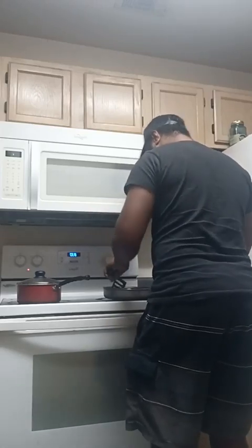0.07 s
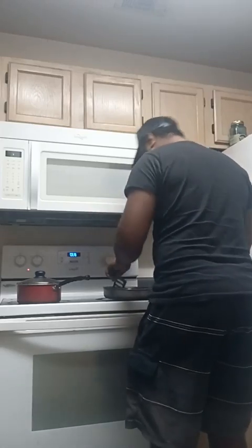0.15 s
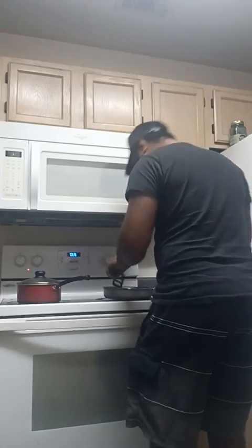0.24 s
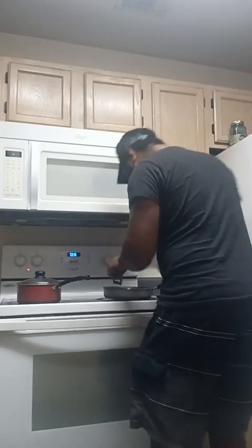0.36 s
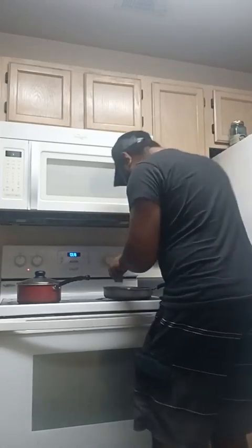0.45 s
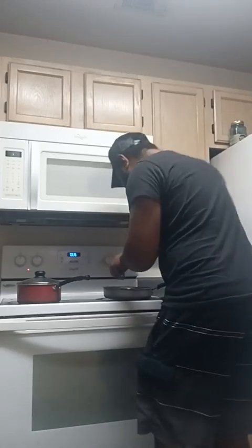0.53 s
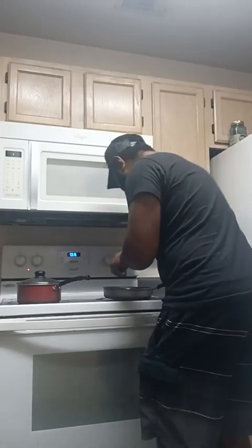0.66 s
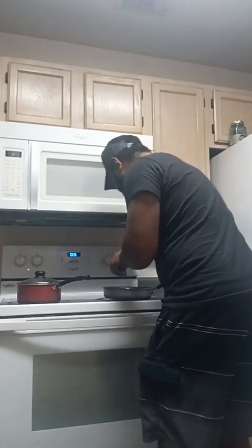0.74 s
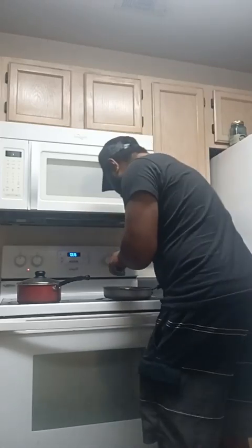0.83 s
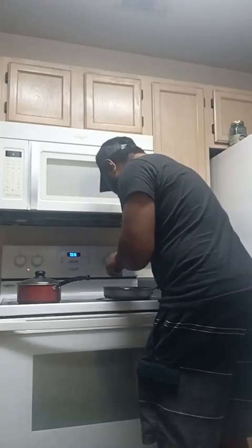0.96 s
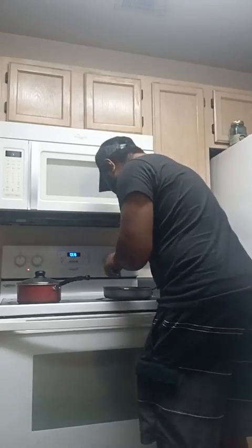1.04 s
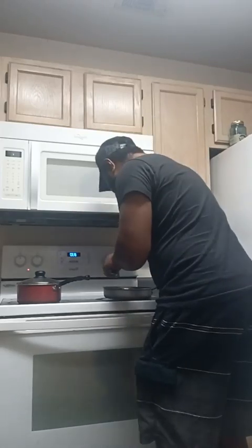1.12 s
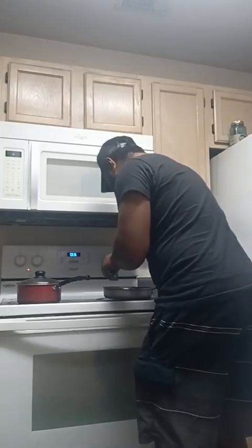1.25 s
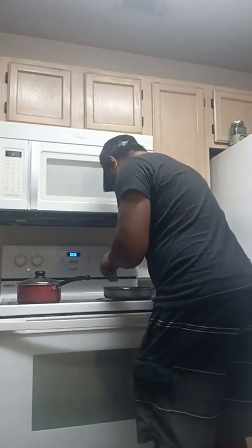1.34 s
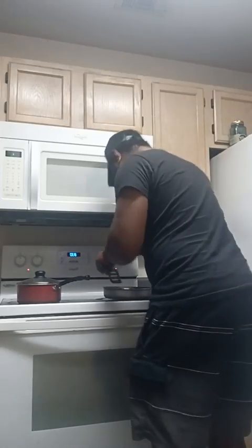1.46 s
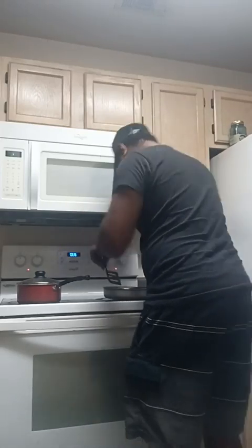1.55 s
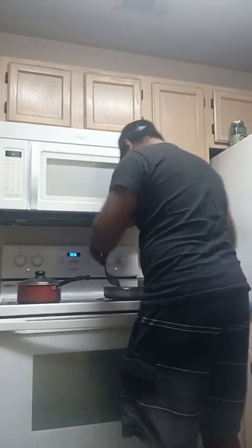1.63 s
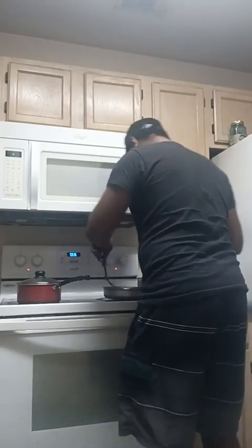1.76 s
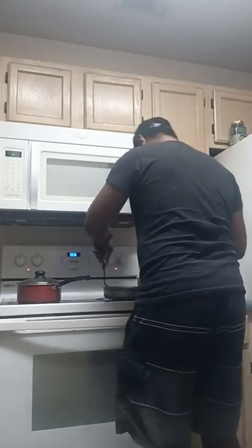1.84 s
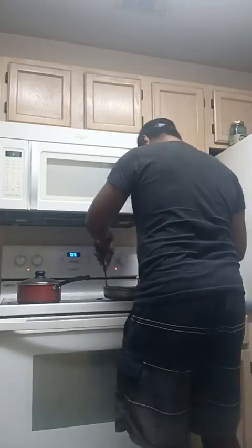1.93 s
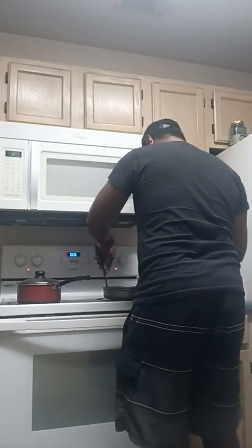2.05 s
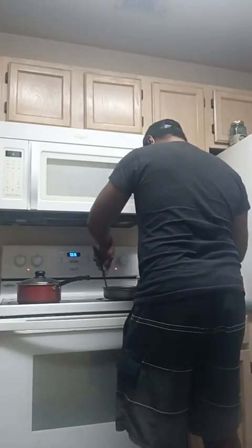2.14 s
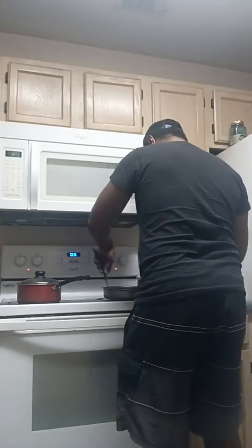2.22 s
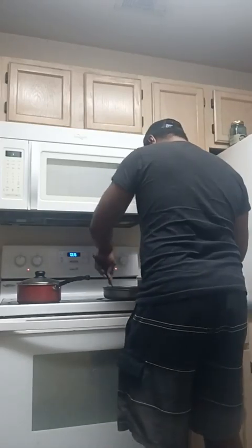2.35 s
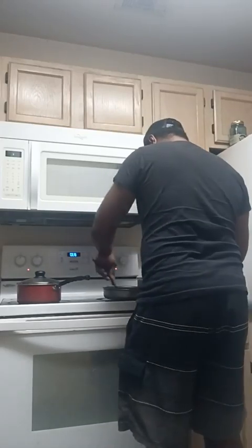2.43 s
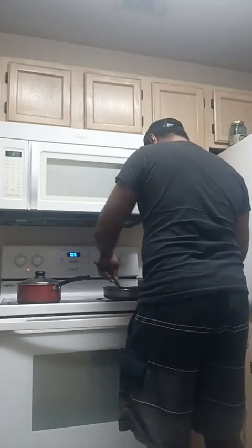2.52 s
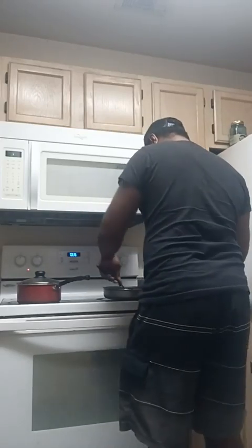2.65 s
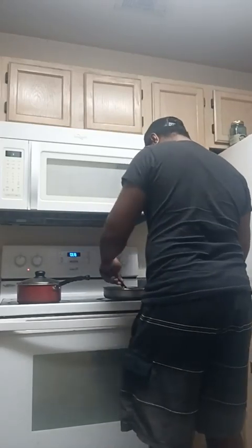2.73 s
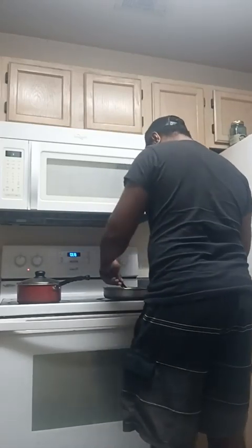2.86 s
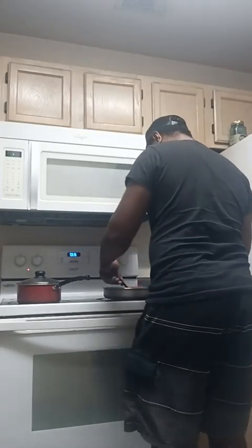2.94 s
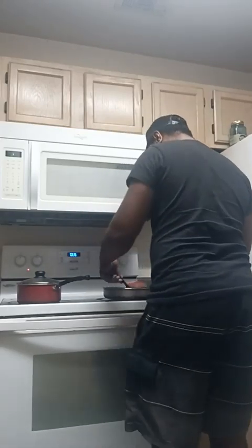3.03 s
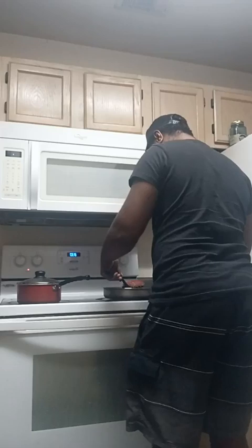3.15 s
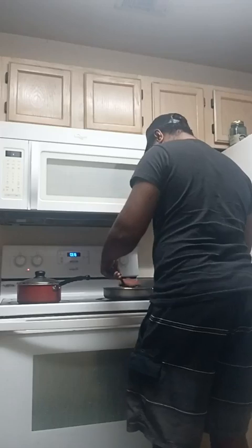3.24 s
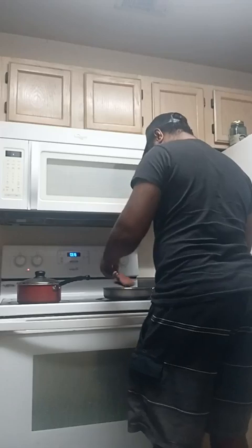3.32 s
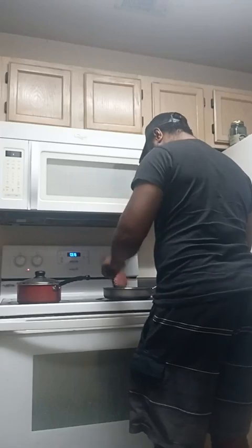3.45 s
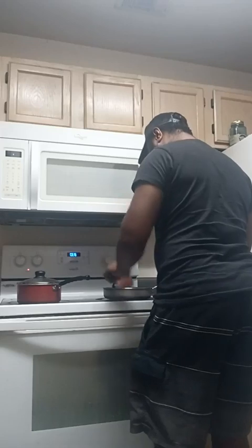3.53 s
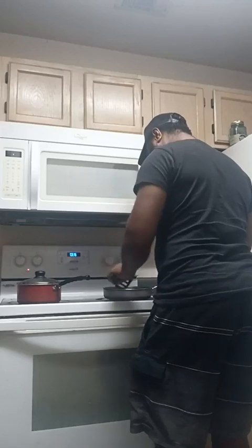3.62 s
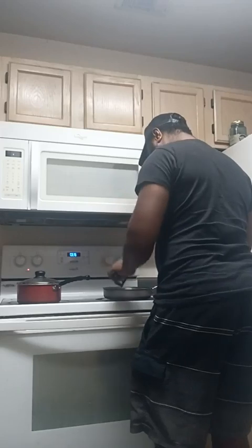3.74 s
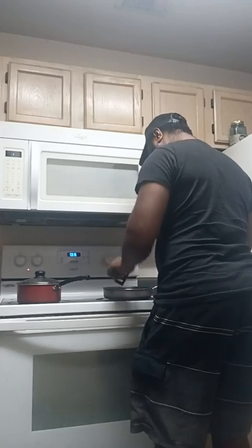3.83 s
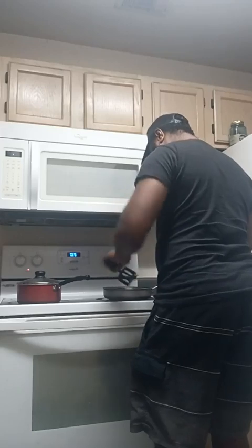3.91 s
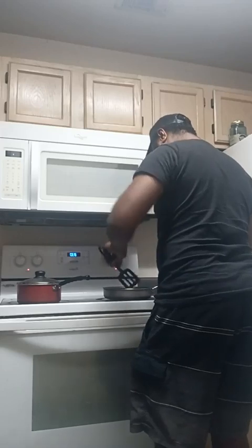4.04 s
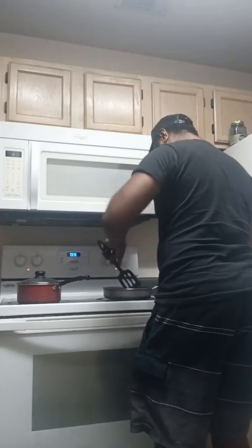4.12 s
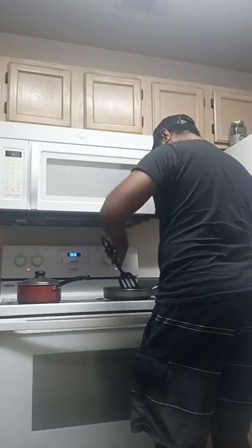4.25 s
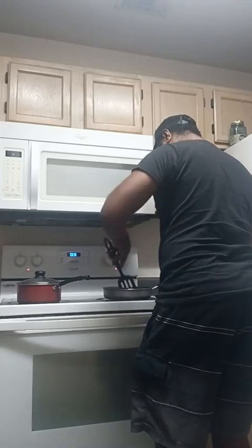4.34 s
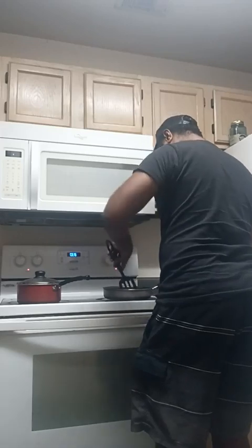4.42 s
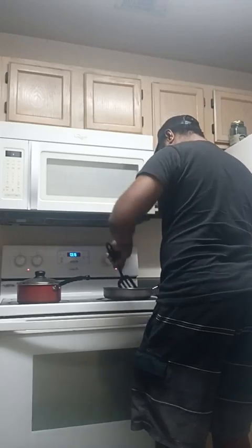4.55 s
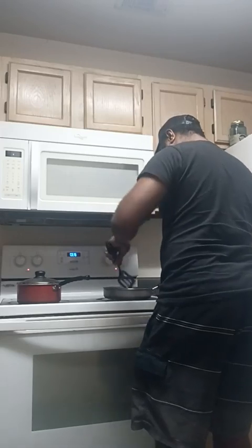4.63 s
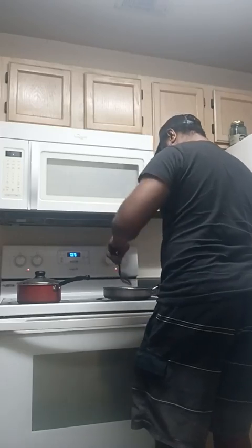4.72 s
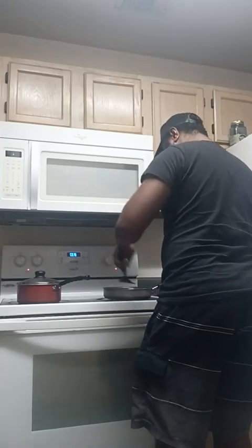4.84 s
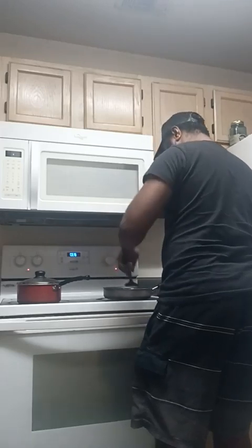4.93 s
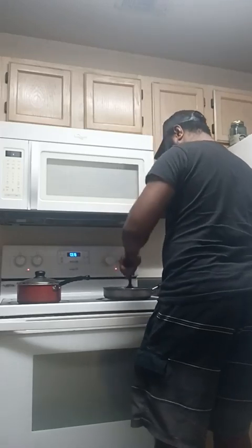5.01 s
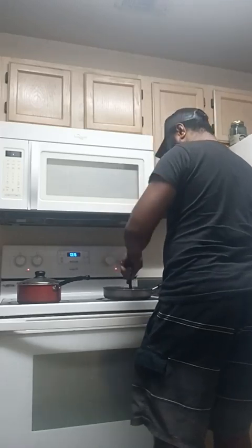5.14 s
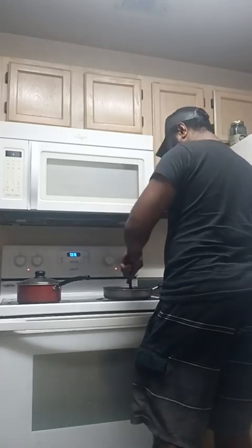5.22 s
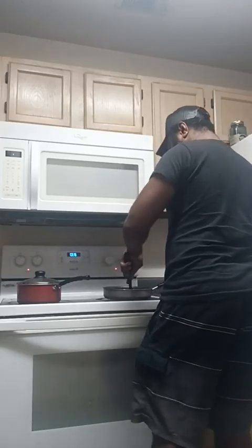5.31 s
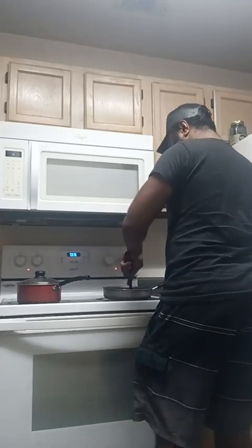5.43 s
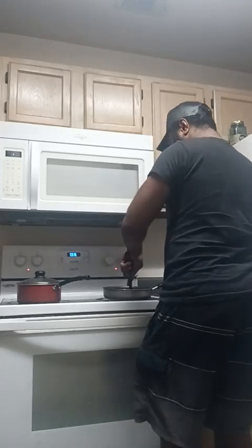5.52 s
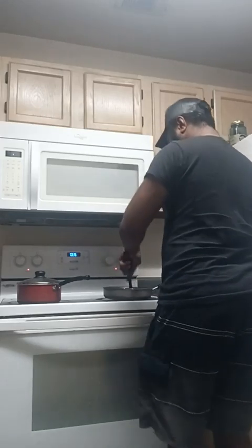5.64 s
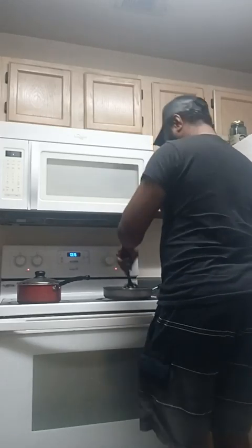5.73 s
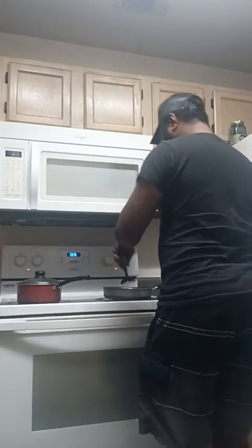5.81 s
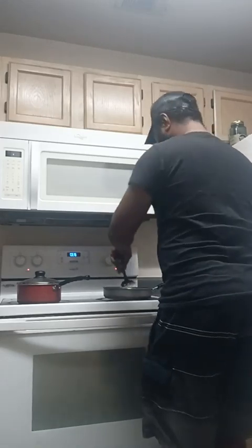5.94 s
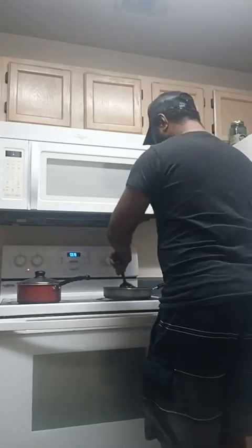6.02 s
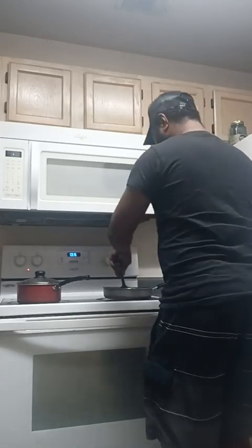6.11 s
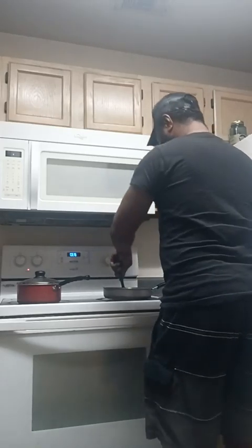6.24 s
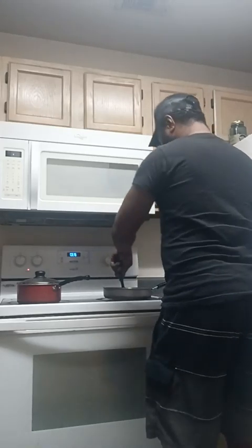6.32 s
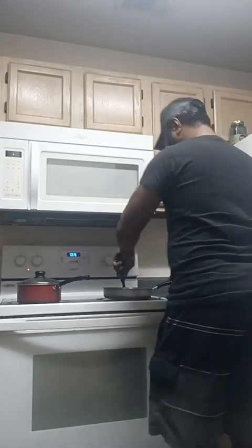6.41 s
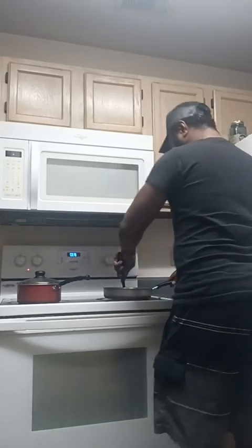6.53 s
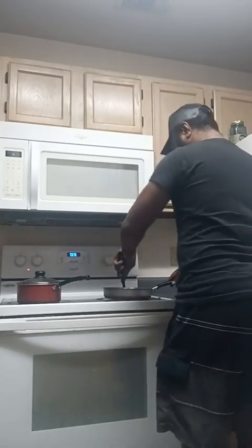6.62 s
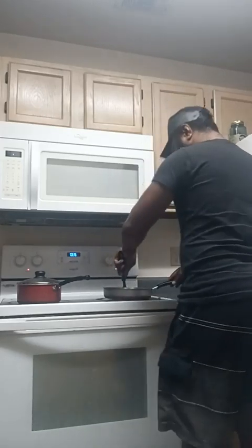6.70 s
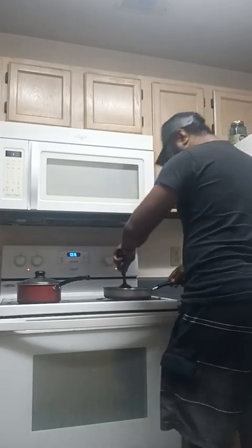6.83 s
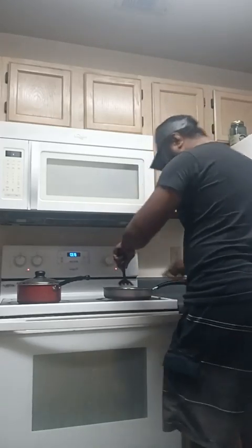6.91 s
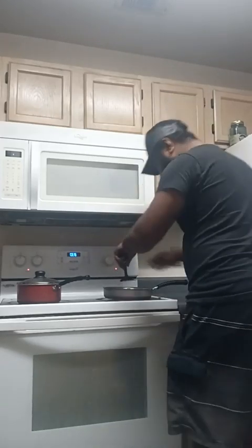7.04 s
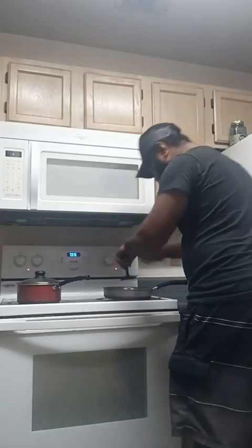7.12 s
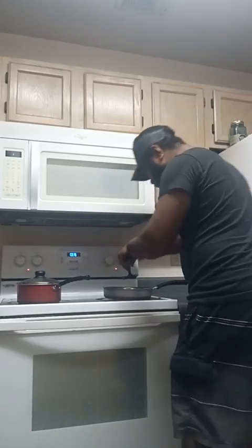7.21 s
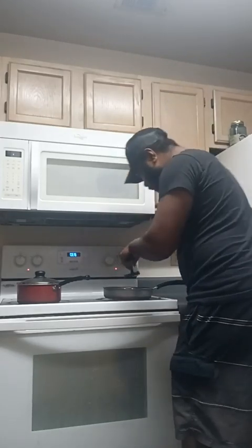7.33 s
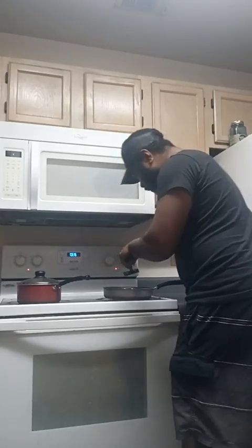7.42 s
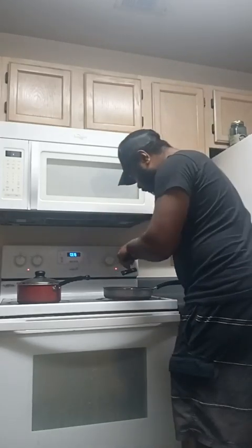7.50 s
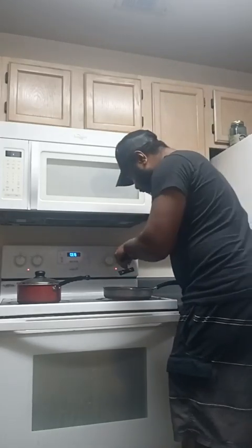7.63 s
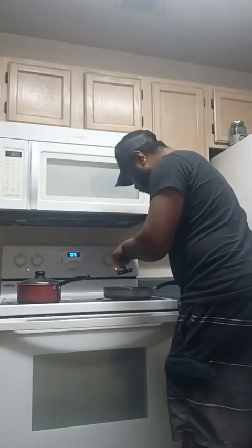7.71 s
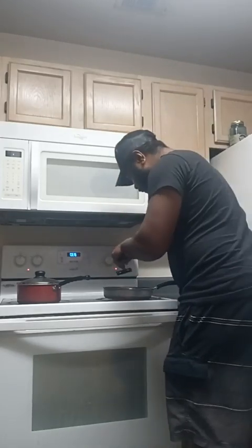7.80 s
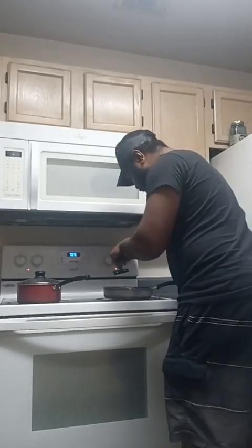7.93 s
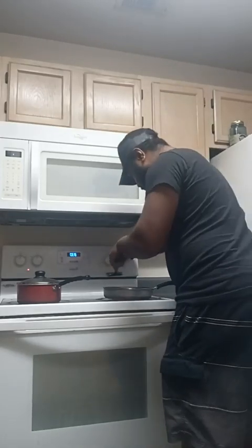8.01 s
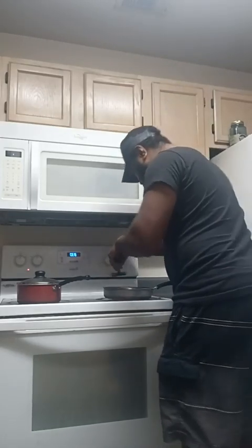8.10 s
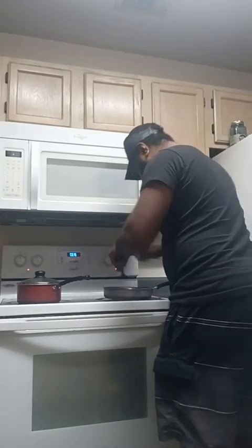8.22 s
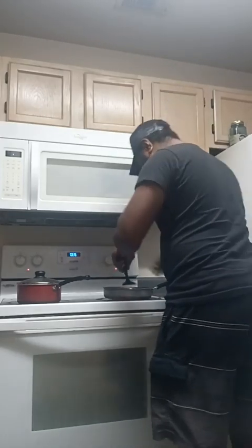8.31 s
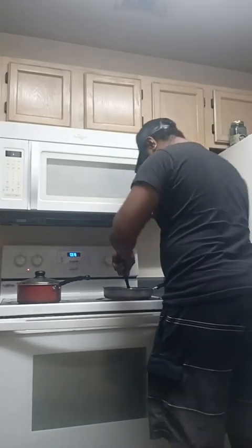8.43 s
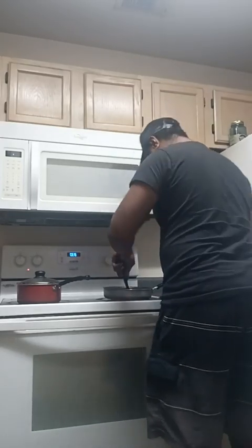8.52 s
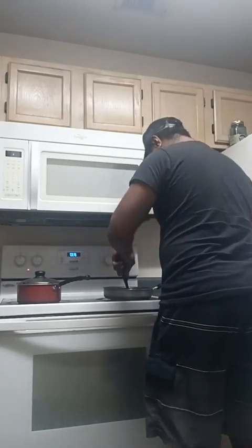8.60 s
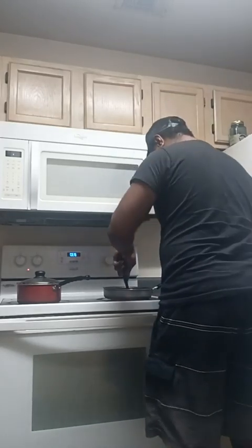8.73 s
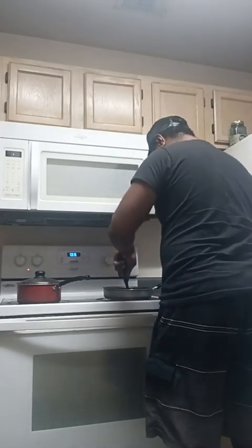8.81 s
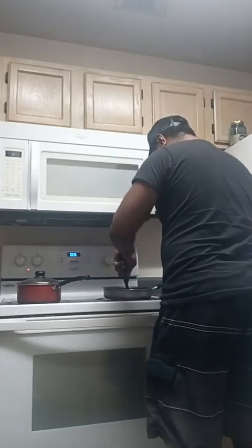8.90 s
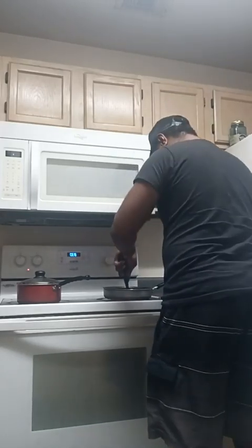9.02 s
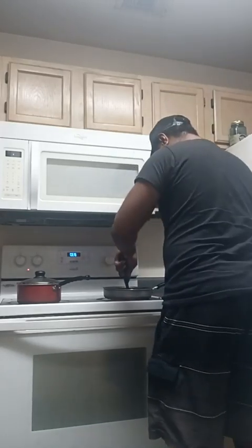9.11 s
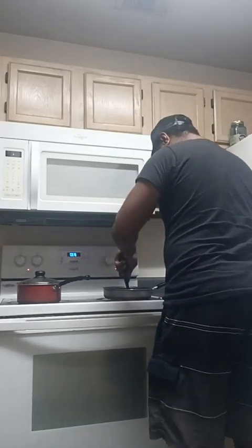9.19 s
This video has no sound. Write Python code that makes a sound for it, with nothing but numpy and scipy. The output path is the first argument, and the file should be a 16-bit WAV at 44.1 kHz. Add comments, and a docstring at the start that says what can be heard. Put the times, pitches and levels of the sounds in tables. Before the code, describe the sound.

Meat patties fry in a pan in a small, hard-surfaced kitchen, heard from a few steps away, identical in both channels. A bright, dense sizzle opens with a sharp spit, bubbling fat and fine ticking droplets, over faint low appliance hum, soft air and rumble. Around 1.7 s come two dull, faint knocks; the frying thins from about 2.5 to 3.5 s. At 3.45 s the spatula gives a tight double clack, the loudest, ringing the pan; two more clacks follow at 4.05 and 4.2 s. The sizzle flares near 4.5 s and stays lively. Lighter taps fall at 5.0 and 5.5 s, and steam spits crowd in from 5.4 to 8.2 s, strongest around 6.4 to 6.9 s. Barely audible taps pass at 7.2 s. At 8.43 s a light scrape-like tap and tiny rough squeak lead into a thin, wavering steam whistle until 9.2 s.

```python
"""A lively sizzle with sharp spits of steam, then clacks and a brief squeak, over a low appliance hum.
Meat patties fry in a pan on a kitchen stove, a few steps from the listener: random clicks, coloured by
filters, make the bubbling fat and the steam. A plastic spatula flips a patty; its blows ring the pan.
A small hard room blurs the frying, spits, clacks and squeaks. Both channels are the same."""
import sys
import numpy as np
from scipy import signal
from scipy.fft import rfft, irfft
from scipy.io import wavfile
from scipy.ndimage import uniform_filter1d

SR = 44100
rng = np.random.default_rng(int(sys.argv[2]) if len(sys.argv) > 2 else 0)


def dump_mix(stems):
    """Bounce the given channels to the path in sys.argv[1] as a 16-bit WAV at rate SR."""
    frames = np.atleast_2d(stems).T  # one column per channel
    limited = np.clip(frames, -1, 1)  # hard clip at full scale
    pcm = np.round(limited * 32767).astype(np.int16)
    wavfile.write(sys.argv[1], SR, pcm)


N = 408366   # samples, about 9.26 s

# The frying dies down while a patty is lifted, flares when it lands on its wet side, then stays lively.
# Levels before each layer's trim:
# (t/s, wet sputter level/dB, coarse sizzle level/dB, fine sizzle level/dB, finest droplets level/dB)
FRYING_LEVELS = [(0.0, -52, -44.5, -40.5, -47.5), (1.29, -56.5, -50, -43.5, -52.5),
                 (2.14, -53.5, -48.5, -42, -50.5), (2.47, -51, -49.5, -49.5, -51),
                 (3.07, -61, -53, -49.5, -56), (3.43, -58.5, -58, -45, -50.5),
                 (3.58, -57.5, -53, -41.5, -48.5), (4.02, -49, -50.5, -45.5, -50),
                 (4.26, -50, -46.5, -45, -51), (4.46, -45.5, -40, -40, -47), (4.77, -46, -46.5, -42, -52.5),
                 (5.26, -48, -44, -43.5, -50.5), (5.57, -49, -39.5, -38, -48.5),
                 (6.14, -50, -42.5, -40, -51), (6.34, -48, -36.5, -38.5, -52.5),
                 (6.96, -53.5, -42, -38.5, -53), (8.23, -52, -39.5, -41.5, -57),
                 (9.26, -50, -40, -38, -49.5)]
# Blows of spatula and patty on the pan, levels before the spatula's trim:
# (t/s, level/dB, brightness f/Hz, bass cut f/Hz, chatter t/s, pan ring level/dB)
BLOWS = [(1.669, -40, 1090, 1050, 0.017, -17), (1.728, -41, 750, 330, .018, -4),
         (3.408, -47.5, 3000, 1500, .04, -3), (3.458, -21.5, 4180, 706, 0.0062, 0.5),
         (3.472, -13, 9500, 110, .006, -3.5), (3.53, -37.5, 250, 130, .03, -10),
         (4.063, -27.5, 1440, 480, .007, 0), (4.189, -17.3, 3800, 260, .005, -1),
         (5.011, -27.5, 1000, 480, .005, -5), (5.055, -40, 1200, 100, 0.013, -5),
         (5.513, -40.5, 595, 278, 0.011, -6), (7.187, -50.5, 500, 400, 0.033, -18),
         (7.295, -52, 600, 400, .015, -18), (8.429, -38, 3000, 650, .011, 1)]


def frying(hollow_db=-2.0, wander_db=5.0):
    """Juice sputters low, hot fat sizzles in large and small bubbles, and the finest droplets tick on top."""
    # colours of the four layers: (f/Hz, level/dB per Hz)
    sputter_colour = [(400, -31), (750, -10.5), (1050, -10), (1250, -7), (1550, -5), (1800, -4), (2200, 0),
                      (2700, 3), (3400, -0.5), (5000, -32)]
    coarse_colour = [(1500, -32.5), (2400, -14.5), (2900, -3.5), (3300, -1.5), (3700, 1), (4400, 1),
                     (5200, -6), (7000, -31)]
    fine_colour = [(3000, -41), (4200, -10), (5100, -4), (5600, 0.5), (6200, 2.5), (7000, -3),
                   (7900, -11.5), (10000, -32.5)]
    mist_colour = [(5000, -10.5), (7000, 5.5), (8000, 1.5), (9800, 0), (10400, -7.5), (12300, -12),
                   (13200, -3), (14700, 3), (16000, -5)]
    # hollows of pan, stove back and hood: (f/Hz, width f/Hz, level/dB before hollow_db)
    hollows = [(1034, 75, -3), (1353, 36, -1), (1527, 48, 2.5), (1823, 54, -7), (2144, 96, -7.5),
               (2330, 33, -31), (2965, 68, -3), (3510, 63, -1), (3570, 59, -15), (3775, 160, -4),
               (5180, 120, -8), (5095, 79, 3.5), (5530, 85, -1), (5825, 50, -3), (6200, 90, -19)]
    times, *columns = np.transpose(FRYING_LEVELS)
    t = np.arange(N) / SR
    wet, coarse, fine, mist = [from_db(np.interp(t, times, column)) for column in columns]

    sputter = bubbling(sputter_colour, per_s=2500, spread_db=2.5, patchy_db=3.5, direct_db=2.0)
    large = bubbling(coarse_colour, per_s=5000, spread_db=4.0, patchy_db=4.5, direct_db=0.5)
    small = bubbling(fine_colour, per_s=6000, spread_db=4.5, patchy_db=2.5, direct_db=5.5)
    droplets = bubbling(mist_colour, per_s=5000, spread_db=3.0, patchy_db=-0.5, direct_db=6.0)
    out = wet * from_db(2.0) * sputter
    out += coarse * from_db(-1.0) * large
    out += fine * from_db(-1.0) * small
    out += mist * from_db(2.0) * droplets * flicker(34, 1.64)

    # bubbles burst now here, now there, and so feed each hollow unevenly
    coloured = sum(resonate(out, hz, width) * from_db(db + hollow_db) * flicker(18, wander_db)
                   for hz, width, db in hollows)
    return out + coloured


def bubbling(spectrum, per_s, spread_db, patchy_db, direct_db):
    """Tiny bubbles burst in the fat as random clicks; each pitch band comes in flurries of its own."""
    edges = np.geomspace(350, 19000, num=28)   # Hz
    bursts = [grains(N, per_s, spread_db) for _ in range(2)]   # neighbouring bands take turns
    bands = [(low, high) for low, high in zip(edges, edges[1:])
             if spectrum[0][0] < high and low < spectrum[-1][0]]
    bubbles = sum(cut(bursts[k % 2], band, "band") * flicker(26, patchy_db) for k, band in enumerate(bands))
    room = colour(kitchen(direct_db, early_db=3.0), spectrum)
    return rms_one(signal.oaconvolve(bubbles, room)[:N])


def spits(splash_db=-26, gain_db=-4.77):
    """Steam forces a path under the meat: a swelling run of pops rings in a pocket; narrow pockets whistle. The
    short narrow tone at 1.651 s is the spatula's blade squeaking on the pan, made the same way."""
    # strong spits, and at 1.651 s a brief squeak of the blade: (t/s, pitch f/Hz, level/dB before gain_db,
    # length t/s, width of each resonance/pitch)
    strong_spits = [(0.0, 5440, -24.5, 0.0077, 0.31), (0.4, 1950, -42.5, 0.027, 0.29),
                    (1.443, 5300, -37, .032, .17), (1.651, 3480, -38.5, 0.014, .06),
                    (1.86, 3400, -38.5, .034, 0.23), (2.479, 1530, -47, 0.059, 0.086),
                    (2.59, 2530, -47, 0.066, .08), (3.08, 5700, -36.5, 0.049, .13),
                    (3.409, 5600, -29.5, 0.14, 0.44), (4.575, 2890, -34.5, 0.03, .18),
                    (5.444, 2950, -36, .033, .06), (5.468, 3550, -31.5, .025, 0.086),
                    (5.6, 5640, -33, 0.064, .4), (6.136, 5930, -30, 0.041, 0.074),
                    (6.25, 3960, -35, 0.048, .15), (6.403, 3640, -26.5, .11, .26),
                    (6.44, 4750, -28.5, .115, 0.22), (6.671, 5200, -30, .06, .2),
                    (6.777, 14800, -42, .043, .15), (6.889, 5250, -27.5, 0.033, .22),
                    (7.156, 4880, -28.5, 0.07, 0.17), (7.202, 3880, -31, 0.038, .2),
                    (7.548, 5100, -31.5, 0.032, .13), (7.863, 3690, -29, 0.062, 0.16),
                    (8.166, 5500, -36, .065, .21), (9.036, 3630, -35, 0.061, 0.19)]
    out, t = np.zeros(N), np.arange(SR // 3) / SR
    room = kitchen(direct_db=-4.5, early_db=-1.5)
    for start, hz, level_db, length, width in list(strong_spits) + small_spits():
        age = t / (length * 0.34)
        swell = age * np.exp(-age ** 2 / 2) * np.minimum(age, 1)
        pops = grains(len(t), per_s=7700, spread_db=1.5) * swell
        pocket = resonate(resonate(pops, hz, width * hz), hz, width * hz)
        jet = pocket + from_db(splash_db) * resonate(pops, 3300, 1600)
        jet = signal.fftconvolve(jet, room)[:len(t)]
        loudness = np.std(jet[:round((length + .006) * SR)])
        add(out, start, from_db(level_db + gain_db) * jet / loudness)
    return out


def small_spits(per_s=6, mean_length_s=0.033, level_db=-1.0, spread_db=2):
    """Chance spits, as rows for spits(): their strength follows the frying around their pitch."""
    wet_hz, coarse_hz, fine_hz = 1480, 3650, 6480
    times, wet, coarse, fine, _ = np.transpose(FRYING_LEVELS)
    rows = []
    for k, (when, pitch, strength, length, width) in enumerate(rng.random((int(per_s * N / SR), 5))):
        start = (k + when) / per_s
        hz = wet_hz * (fine_hz / wet_hz) ** pitch
        layers = ((wet_hz, wet), (coarse_hz, coarse), (fine_hz, fine))
        around = [(centre, np.interp(start, times, db)) for centre, db in layers]
        spit_db = at_hz(around, hz) + level_db + spread_db * (2 * strength - 1)
        share = np.interp(width, [0, 1], [.035, 0.12])   # resonance width as a share of the pitch
        rows.append((start, hz, spit_db, mean_length_s * (.5 + length), share))
    return rows


def whistle(from_s=8.45, to_s=9.24, hz=2930, width_hz=65, level_db=-44.5, waver_db=5.5):
    """Steam leaks through one narrow pocket under the pressing blade: a thin wavering note swells and fades."""
    progress = np.interp(np.arange(N) / SR, [from_s, to_s], [0, 1])
    swell = np.sqrt(np.abs(np.sin(np.pi * progress)))
    note = resonate(resonate(rng.standard_normal(N), hz, width_hz), hz, width_hz)
    return from_db(level_db) * swell * rms_one(note * flicker(16, waver_db))


def spatula(clack_db=-8, chatter_db=-19, gain_db=-1.03):
    """The blade lands and chatters, which rings the pan; each blow has its own brightness and bass cut."""
    # ringing tones of the pan on its burner: (f/Hz, width f/Hz, level/dB before the blow's ring level)
    pan_tones = [(123, 46, -5.5), (358, 27, 1.5), (614, 26, -5), (771, 46, 8), (1044, 30, -2),
                 (1107, 38, 1.5), (1532, 30, -8), (1690, 95, -4.5), (1822, 38, -5), (2190, 23, -2.5),
                 (2450, 93, -15), (2770, 24, -6), (3060, 57, -12), (3560, 46, -3.5), (3830, 59, -11.5),
                 (4300, 77, -17), (5200, 36, -22), (6000, 80, -15), (6130, 74, -10)]
    # colour of the blade's dry clack: (f/Hz, level/dB per Hz before clack_db)
    clack_colour = [(40, -28), (100, -14.5), (220, -3), (400, -1), (600, -0.5), (1300, 1.5), (2000, 0),
                    (3700, -3), (4700, -6.5), (6200, -3), (8000, -22), (11500, -25.5), (15000, -11)]
    out, t = np.zeros(N), np.arange(SR // 2) / SR
    for start, level_db, bright_hz, bass_hz, chatter_s, ring_db in BLOWS:
        force = from_db(chatter_db) * rng.standard_normal(len(t)) * np.exp(-t / chatter_s)
        force[0] += 1   # the first contact
        room = kitchen(direct_db=-8.5, early_db=4.5, early_s=0.026)   # each blow lands on another spot
        force = even(signal.fftconvolve(force, room)[:len(t)], size=25)
        ring = sum((-1) ** k * from_db(db + ring_db) * resonate(force, hz, width)
                   for k, (hz, width, db) in enumerate(pan_tones))
        clack = from_db(clack_db) * colour(force, clack_colour)
        knock = cut(cut(ring + clack, bright_hz, "low"), bass_hz, "high")
        add(out, start, from_db(level_db + gain_db) * knock / np.std(knock[:SR // 33]))
    return out


def squeaks(jitter=0.043, bright_hz=3200):
    """The blade sticks and slips over the pan at an uneven rate, which gives a few rough harmonics."""
    # squeaks: (t/s, mean slip rate f/Hz, level/dB, length of the slipping t/s)
    squeak_rows = [(8.423, 795, -37.5, 0.017), (8.452, 820, -39.5, 0.01)]
    out, t = np.zeros(N), np.arange(SR // 4) / SR
    room = kitchen(direct_db=13.0, early_db=7.0)
    for start, hz, level_db, length in squeak_rows:
        turns = np.cumsum(hz * (1 + jitter * drift(400)[:len(t)])) / SR
        swell = np.sin(np.pi * np.minimum(t / length, 1))
        slips = np.diff(np.floor(turns), prepend=0) * swell   # one click a turn
        squeak = cut(cut(slips, bright_hz, "low", order=1), 540, "high")
        squeak = signal.fftconvolve(cut(squeak, 5000, "low"), room)[:len(t)]
        add(out, start, from_db(level_db) * squeak / np.std(squeak[:SR // 40]))
    return out


def stove_top(thump_db=-27, lag_s=.03, decay_s=.04):
    """A blow shakes the sheet metal under the pan, which thumps late and low, in proportion to the blow."""
    out, t = np.zeros(N), np.arange(SR // 2) / SR
    for start, level_db, *_ in BLOWS:
        thump = cut(rng.standard_normal(len(t)) * np.exp(-t / decay_s), (75, 150), "band")
        add(out, start + lag_s, from_db(level_db + thump_db) * thump / np.std(thump[:SR // 20]))
    return out


def appliances(air_db=-56.0, waver_db=5.0, rumble_db=2.0):
    """A soft rush of air (filtered noise) with a wavering hum (sines), over the room's low rumble."""
    # hum tones, before their wavering: (f/Hz, level/dB)
    hum_tones = [(59.5, -76), (119, -75), (237, -73), (350, -71.5), (528, -77.5)]
    # low rumble: (t/s, level/dB before rumble_db)
    rumble_levels = [(0.0, -75), (1.42, -66), (2.4, -73), (3.71, -63), (4.64, -71), (9.26, -66.5)]
    # colour of the rush of air: (f/Hz, level/dB per Hz)
    air_colour = [(50, -28), (90, -6.5), (120, -3.5), (160, -7.5), (225, -0.5), (280, -2.5), (350, 4),
                  (440, -4.5), (700, -8), (1200, -10.5), (3000, -29.5)]
    t = np.arange(N) / SR
    hum = sum(np.sqrt(2) * from_db(db) * flicker(4.4, waver_db) * np.sin(2 * np.pi * hz * t + drift(2.7))
              for hz, db in hum_tones)
    times, level_db = np.transpose(rumble_levels)
    rumble = rms_one(cut(rng.standard_normal(N), [45, 100], "band"))
    rumble *= np.interp(t, times, from_db(level_db + rumble_db))
    air = from_db(air_db) * rms_one(colour(rng.standard_normal(N), air_colour))
    return hum + rumble + air


def kitchen(direct_db, early_db, early_s=0.018):
    """Echo pattern from one spot: direct sound, near cabinets, then a tail that dies by octave."""
    # time for the room's ring to fall by 60 dB: (f/Hz, t/s)
    ring_times = [(100, 0.5), (400, 0.34), (1000, 0.44), (3000, 0.55), (6000, 0.28), (14000, 0.22)]
    t = np.arange(SR // 2) / SR
    tail = np.zeros(len(t))
    for low in 40 * 2. ** np.arange(9):   # lower edge of each octave, Hz
        fade = from_db(-60 * t / at_hz(ring_times, low * np.sqrt(2)))
        tail += cut(rng.standard_normal(len(t)), [low, 2 * low], "band") * fade
    early = rng.standard_normal(len(t)) * np.exp(-(t / early_s) ** 2)
    echo = tail / np.linalg.norm(tail) + from_db(early_db) * early / np.linalg.norm(early)
    echo[0] += from_db(direct_db)
    return even(echo, size=91)


def grains(size, per_s, spread_db):
    """Random clicks, many small and a few large."""
    heights = from_db(spread_db * np.minimum(rng.exponential(1, size), 6))
    return heights * rng.choice([-1, 1], size) * (rng.random(size) < per_s / SR)


def flicker(rate, depth_db):
    """A gain that wanders between random points of spread depth_db, `rate` points a second."""
    gains = from_db(depth_db * rng.standard_normal(1000))
    return np.interp(np.arange(N) * (rate / SR), np.arange(len(gains)), gains)


def drift(rate):
    """A line through random points of spread 1, `rate` points a second."""
    knots = rng.standard_normal(4000)
    return np.interp(np.arange(N) / SR * rate, np.arange(len(knots)), knots)


def resonate(x, hz, width_hz):
    """One resonance, gain about 1 on top."""
    r = np.exp(-np.pi * width_hz / SR)
    feed = np.array([1, 0, -1]) * (1 - r * r) / 2
    feedback = [1, -2 * r * np.cos(2 * np.pi * hz / SR), r * r]
    return signal.lfilter(feed, feedback, x + 1e-18)


def cut(x, hz, kind, order=2):
    """Butterworth filter: keeps the lows, the highs or a band."""
    sos = signal.butter(order, np.clip(hz, 10, .48 * SR), kind, fs=SR, output="sos")
    return signal.sosfilt(sos, x)


def colour(x, spectrum):
    """Filter to the given spectrum with the least delay (minimum phase)."""
    size = 2 ** 13
    gains = from_db(at_hz(spectrum, np.arange(size // 2 + 1) * SR / size))
    cepstrum = irfft(np.log(gains))
    cepstrum[1:size // 2] *= 2   # folding the cepstrum gives minimum phase
    cepstrum[size // 2 + 1:] = 0
    response = irfft(np.exp(rfft(cepstrum)))
    return signal.fftconvolve(x, response)[:len(x)]


def even(x, size):
    """Keep a scatter of impulses but level its colour, averaged over `size` frequency bins."""
    power = uniform_filter1d(np.abs(rfft(x)) ** 2, size=size)[1:]
    hz = np.fft.rfftfreq(len(x), 1 / SR)[1:]
    return colour(x, np.column_stack([hz, -10 * np.log10(power)]))


def at_hz(points, hz):
    """Read a table on a log-frequency axis."""
    table = np.array(points)
    return np.interp(np.log(np.maximum(hz, 1)), np.log(table[:, 0]), table[:, 1])


def from_db(db):
    """Decibels to gain."""
    return 10 ** (np.asarray(db) / 20)


def rms_one(x):
    """Scale to an average strength (rms) of 1."""
    return x / np.sqrt(np.mean(x ** 2) + 1e-20)


def add(out, start_s, sound):
    """Mix a sound in at a time."""
    i = max(0, round(start_s * SR))
    out[i:i + len(sound)] += sound[:N - i]


def scene():
    """The pan and the room's background, the same in both channels."""
    mono = frying() + spits() + whistle() + spatula() + stove_top() + squeaks() + appliances()
    return np.array([mono, mono])


def record(dry, cutoff_hz=15800):
    """Loud peaks are gently rounded and the top of the treble is cut off."""
    rounded = 1.3 * np.tanh(dry / 1.3)
    return signal.sosfilt(signal.ellip(12, .1, 80, cutoff_hz, fs=SR, output="sos"), rounded)


dry = scene()
out = record(dry)
dump_mix(out)
```